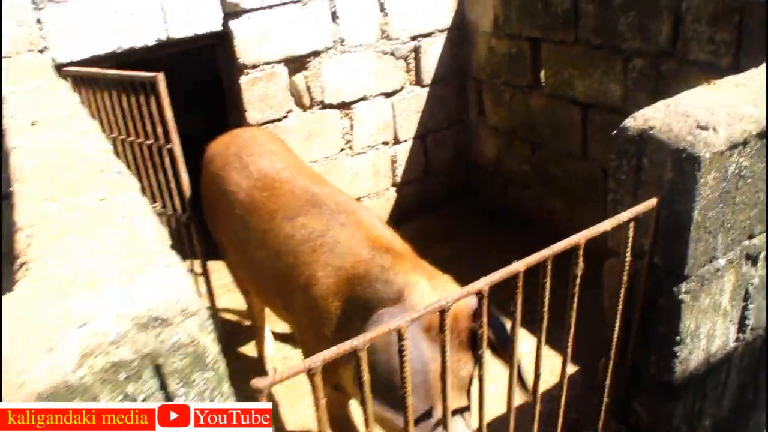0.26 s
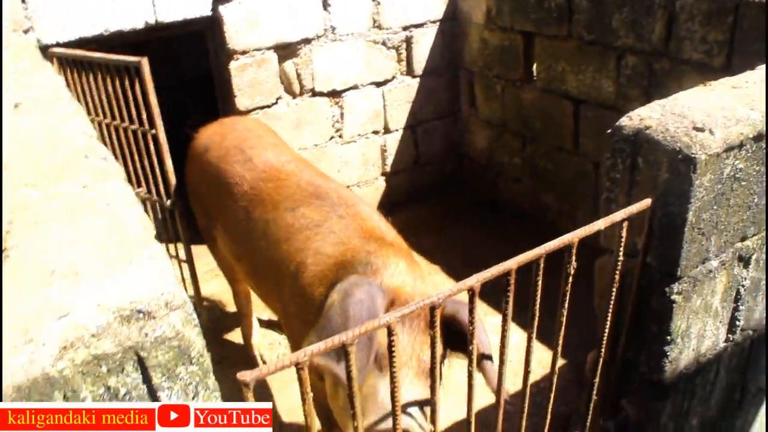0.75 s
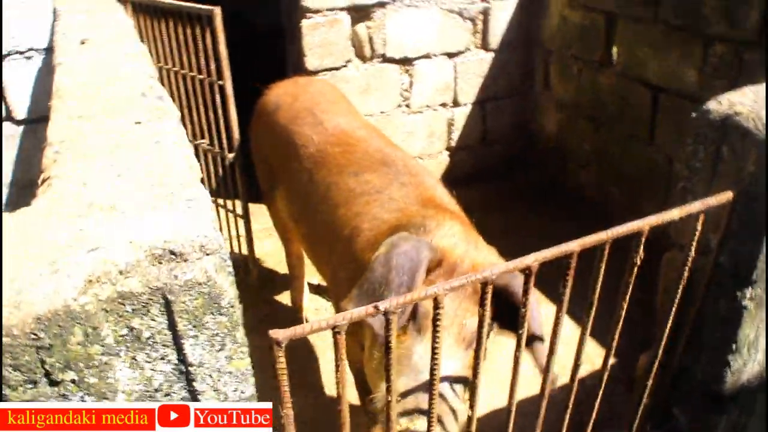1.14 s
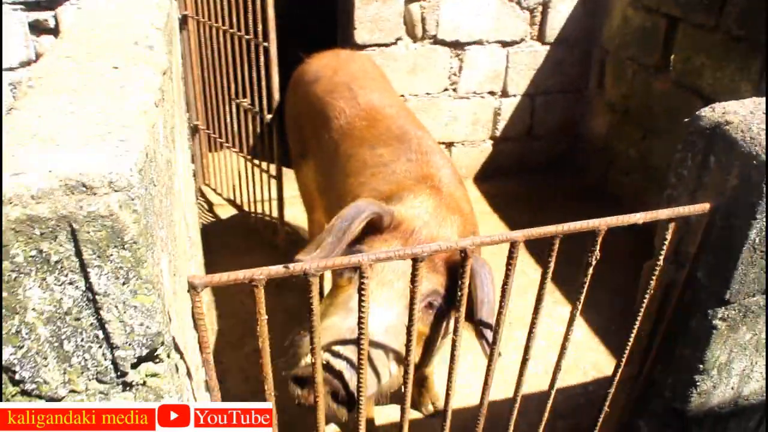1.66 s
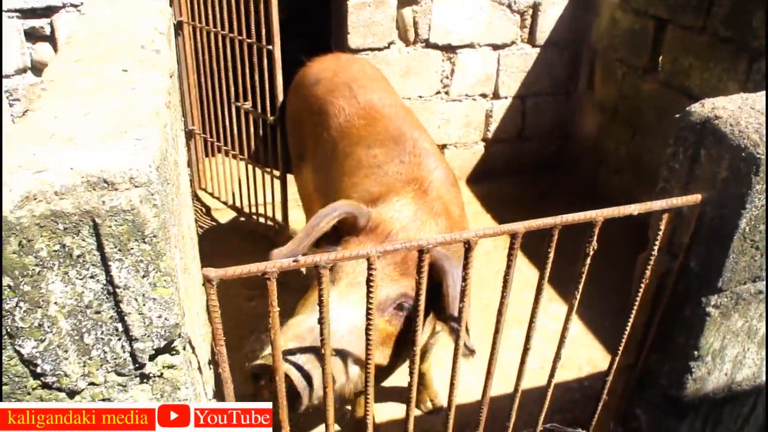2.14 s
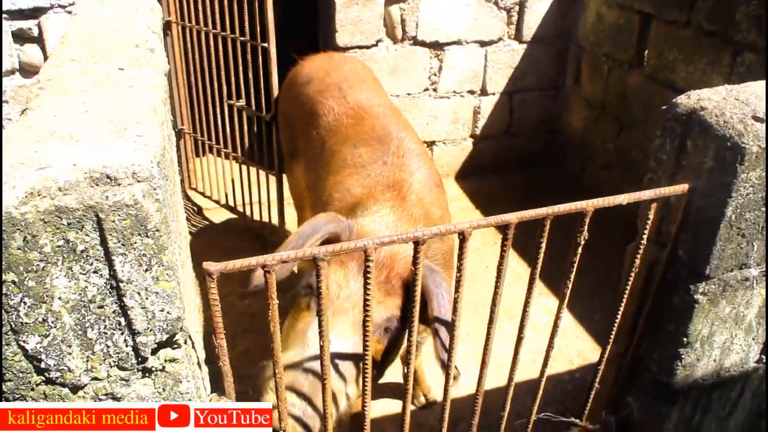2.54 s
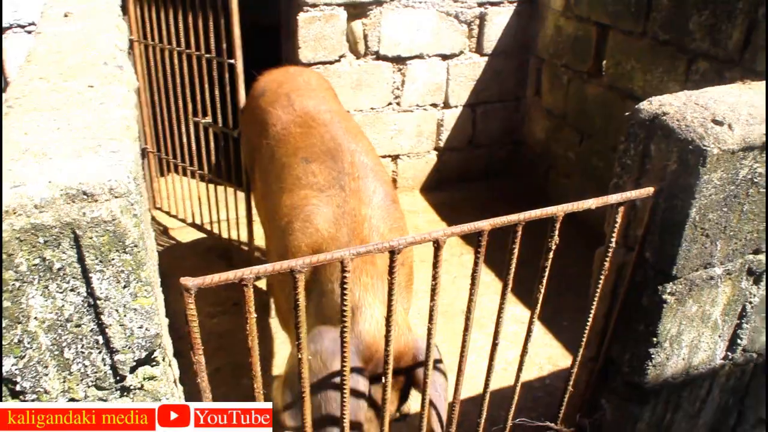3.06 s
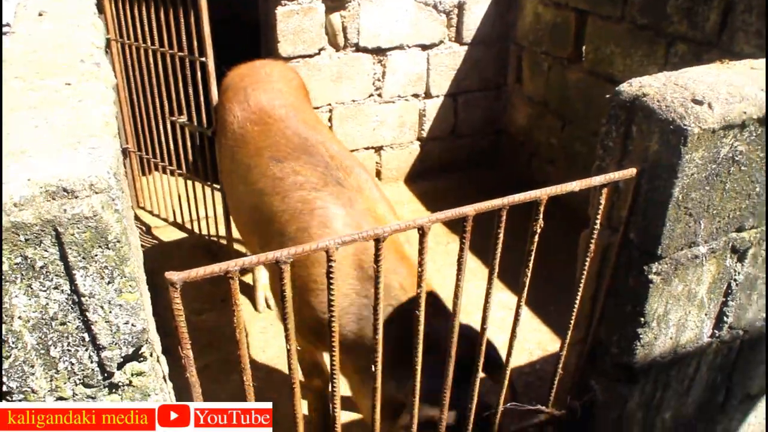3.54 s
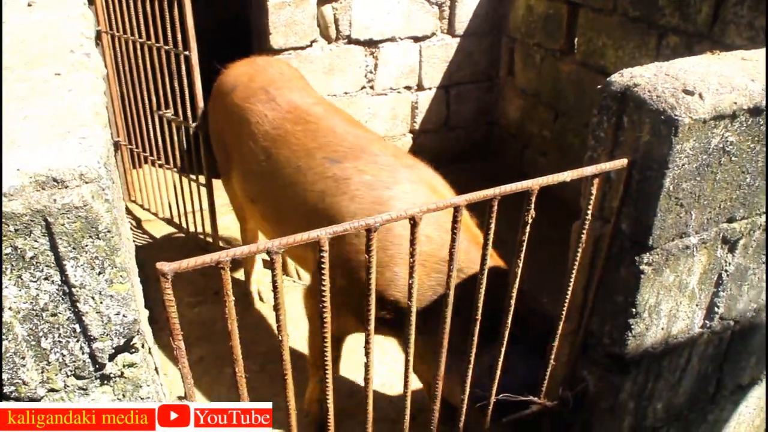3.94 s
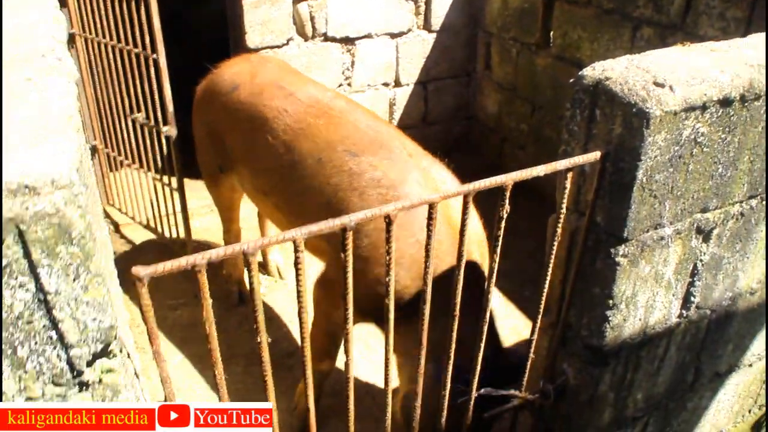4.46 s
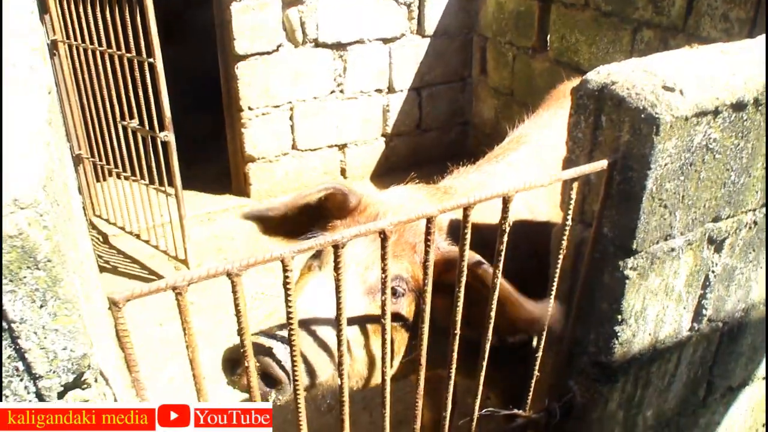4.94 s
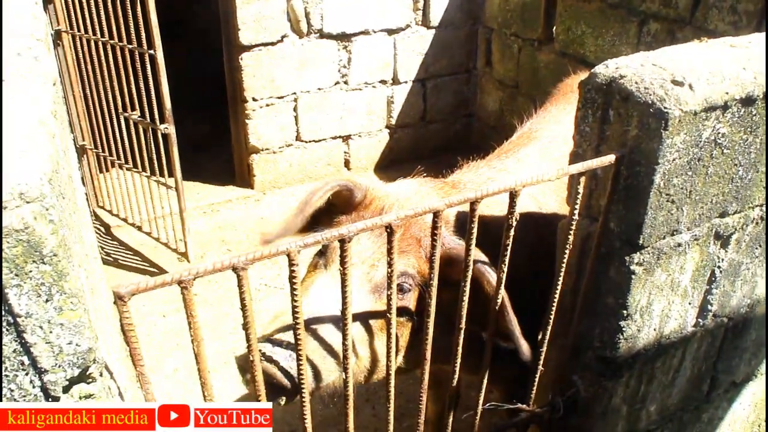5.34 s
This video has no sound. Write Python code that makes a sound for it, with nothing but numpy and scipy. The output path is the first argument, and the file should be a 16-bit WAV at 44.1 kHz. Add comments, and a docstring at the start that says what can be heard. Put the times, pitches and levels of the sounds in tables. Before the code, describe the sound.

A pig gives four short, low, pulsing grunts close by in a concrete pen, over high insect whine and outdoor rush, then dry clicks late on.

```python
"""In a concrete pen, close to the microphone, a pig grunts four times: slow slaps of the vocal folds ring
in throat and snout, with short gliding sine tones in and after the grunts, and breathy puffs of air. Beyond
it insects hold a high tone of beating narrow-band noise over a wide outdoor rush of coloured noise. Dry
ticks, mostly late on, and a gritty scrape are noise bursts and grains ringing short resonances; late wind
bumps the microphone. The level dips once, and a peak limiter holds the background down after loud peaks."""
import sys
import numpy as np
from scipy import signal
from scipy.fft import rfft, irfft
from scipy.io import wavfile
from scipy.ndimage import uniform_filter1d, minimum_filter1d

SR = 44100
rng = np.random.default_rng(int(sys.argv[2]) if len(sys.argv) > 2 else 0)


def dump_mix(stems):
    """Bounce the given channels to the path in sys.argv[1] as a 16-bit WAV at rate SR."""
    frames = np.atleast_2d(stems).T  # one column per channel
    limited = np.clip(frames, -1, 1)  # hard clip at full scale
    pcm = np.round(limited * 32767).astype(np.int16)
    wavfile.write(sys.argv[1], SR, pcm)


N = 247401
TIME = np.arange(N) / SR  # s
BINS = np.fft.rfftfreq(4096, 1 / SR)  # Hz

# Source levels below are those before the level curve DIP and the limiter.
# Grunts, one row each: start t/s, settled pulse rate f/Hz, extra length of the first gap t/s,
# mean scale of each slap's smear t/s, peak level/dB before smear and muffling, time from start to peak t/s,
# sag of effort one grunt's length from its peak level/dB, weakening of every second slap by the end level/dB,
# tilt at full effort level/dB per octave, rasp of air level/dB before muffling
GRUNTS = [(0.26, 49.7, 0.01, 0.001495, -6.5, 0.049, 8.5, 15, 2, -33),
          (2.0424, 51.2, 0.0044, 0.00056, 3.5, 0.02, 17.5, 2, 1, -33),
          (2.6516, 43.9, .0105, 0.00095, -2, 0.07, 31.5, 3.5, 0, -33),
          (3.7427, 50.33, 0.00026, 0.0035, -8.5, 0.029, 23, 7, 1, -33.5)]
# Slaps of the folds in each grunt: [count]
SLAPS = [5, 5, 5, 4]
# Throat and snout, one list a grunt: f/Hz before the mouth moves it, width f/Hz, relative level/dB before tilt
THROATS = [
    [(122, 48, 4.5), (296, 150, 0), (726, 36, -11.5), (1023, 65, 3), (1360, 244, -3.5), (1860, 100, -23),
     (2310, 130, -18), (3070, 440, -26.5), (3580, 100, -18.5)],
    [(106, 39, 1.5), (247, 80, 1.5), (350, 28, 3), (717, 110, -5.5), (1000, 81, 3.5), (1270, 140, -1),
     (1950, 100, -14.5), (2760, 460, -21.5), (3240, 210, -13.5), (4620, 420, -28)],
    [(112, 21, -4.5), (325, 98, 1), (688, 45, -3.5), (1086, 164, -7), (1460, 73, -4), (1800, 170, -15),
     (2660, 740, -34), (3520, 360, -27.5)],
    [(143, 164, 1.5), (288, 98, -14.5), (695, 31, 5), (855, 46, -3), (1153, 79, -1.5), (1470, 220, -12),
     (1740, 220, -14), (2150, 390, -22), (2860, 240, -18), (3650, 130, -18)],
]
# Mouth opening, one row a grunt, as a factor on the throat's f: at the start, in the middle, at the end
MOUTHS = [(1.2, 1.018, 0.93), (1.062, 0.97, 1.046), (1.015, 0.997, 0.975), (0.97, 1.07, 0.95)]
# Single throat resonances sounding on in and after the grunts:
# centre t/s, half length t/s, level/dB, f/Hz at centre, glide f/Hz per s
GLIDING_TONES = [(.277, 0.011, -32, 1960, -14000), (0.34, 0.014, -28, 990, -500),
                 (2.123, 0.0075, -30, 1300, 1500), (2.778, 0.017, -22.5, 390, 200),
                 (3.768, 0.039, -32, 137, 94), (3.752, 0.0088, -24.5, 1120, 500),
                 (3.817, 0.024, -31, 1200, 1001)]
# Air from the snout and scuffs on the floor: centre t/s, half length t/s, level/dB, tilt level/dB per octave
PUFFS = [(0.416, 0.035, -39.5, -1.5), (1.155, 0.33, -54.5, 4.5), (1.688, 0.02, -38, -4),
         (1.748, 0.048, -52.5, 3), (2.184, 0.032, -38, 2.5), (2.81, 0.027, -47, 4),
         (3.832, 0.028, -43.5, -0.5), (4.347, 0.055, -48.5, -3), (5.283, 0.023, -47, -2.5)]
# Spectrum of the puffs before tilt: f/Hz, relative level/dB
PUFF_COLOUR = [(300, -6), (1500, 12), (4300, 6), (7000, -2), (11000, -10), (14000, -6), (16000, -27)]
# Dry ticks before the pen's echoes: t/s, peak level/dB, decay t/s, tilt level/dB per octave,
# own ring f/Hz before a small common lowering, strength of that ring level/dB
TICKS = [(0.534, -36, .002, 5, 11200, -14), (1.407, -19.5, 0.0045, -5.5, 2430, 11),
         (3.675, -16.5, 0.001, -8, 3530, 8), (4.836, -35, .0015, 1, 2400, 0),
         (4.8815, -24, 0.0013, 1, 2400, 10), (5.1675, -22.5, 0.0018, 2, 10100, -14),
         (5.212, -18, 0.0015, -2, 2100, 8), (5.221, -18, 0.0025, -2.5, 2400, -12),
         (5.2534, -14, 0.00058, 7, 2070, 19), (5.258, -10, 0.0022, -1.5, 2700, -7),
         (5.268, -22, 0.0047, 0, 2360, 4), (5.5383, -23, 0.0012, 7, 2400, 4),
         (5.578, -20.5, 0.00094, 4, 2200, 10)]
# Short resonances of ticks and scrape: f/Hz before a small lowering, width f/Hz, relative level/dB before tilt
TICK_MODES = [(1150, 770, -3.5), (1860, 100, -11), (2405, 230, -2), (3330, 970, -1.5), (6100, 1300, -13.5),
              (7660, 1600, -14.5), (10000, 1700, -16.5), (13900, 1400, -15)]
# Surges of the insects' tone: start t/s, nominal length t/s, level/dB before a common trim
SURGES = [(0.023, 0.091, -27.5), (0.639, 0.045, -29.5), (1.056, 0.1, -30.5), (1.581, 0.078, -31),
          (1.877, 0.024, -33.5), (2.032, 0.035, -27), (3.357, 0.048, -31), (3.669, 0.051, -24.5),
          (3.866, 0.041, -29), (4.382, 0.073, -30), (5.154, 0.044, -28), (5.471, 0.05, -28)]
# Faint upper lines of the insects: f/Hz, spread f/Hz, level/dB
OVERTONES = [(9155, 12, -67), (12100, 45, -78.5), (6670, 10, -72.5), (5750, 25, -70)]
# Outdoor rush: f/Hz, relative level/dB per Hz
RUSH = [(15, -45), (28, -17.5), (53, -7), (120, -5.5), (200, -1), (380, 0.5), (850, -2.5), (1400, -8),
        (2500, -15.5), (4000, -22), (6000, -30.5), (8000, -39), (13800, -45.5), (15200, -52)]
# Wind on the microphone: centre t/s, half length t/s, level/dB
GUSTS = [(4.934, .022, -35), (4.98, 0.017, -31), (5.072, .025, -39), (5.2, 0.022, -38),
         (5.51, 0.022, -33.5), (5.57, 0.017, -38)]
# Spectrum of the wind: f/Hz, relative level/dB
GUST_COLOUR = [(15, -20), (40, -0.5), (70, 2), (120, -2.5), (250, -23), (800, -66)]
# Echoes from the floor and walls of the pen: delay t/s, level/dB
WALLS = [(.0037, -52), (.0071, -28), (0.0098, -40), (0.016, -25)]
# Gain curve of the whole scene, end values held: t/s, level/dB
DIP = [(4.671, 6), (4.674, -3), (4.73, 1), (4.8, 3.5), (4.86, 7)]

SNAP_S = .0028  # the folds part gently and close sharply: upper limit of the treble's lag behind the bass
DAMPING_S = 0.02  # the folds part again and damp the ring of each slap
BRIGHTENING = 0.26  # harder slaps are brighter: dB per octave for each dB of effort
SNOUT_HZ = 2500  # resonances from here up lie in the bony snout and do not move
OWN_RING_WIDTH_HZ = 290
SCRAPE_S, SCRAPE_HALF_S, SCRAPE_DB, GRAINS_PER_S = 5.258, .045, -38.5, 2000
CHORUS_HZ, CHORUS_SPREAD_HZ, CHORUS_DB = 3051.5, 9.6, -40
OCTAVE_SPREAD_HZ, OCTAVE_DB = 16.3, -50.5
RUSH_DB = -34
CEILING_DB, EDGE_HZ = -1, 15200  # limiter threshold and upper band edge of the recorder


def grunts(settling=0.36, jitter=0.024, muffle_hz=4800):
    """Fold slaps settle to a steady rate, ring the moving throat, and alternate strong and weak towards the end."""
    out = np.zeros(N)
    for row, count, opening, throat in zip(GRUNTS, SLAPS, MOUTHS, THROATS):
        start, rate_hz, lag, smear, peak_db, crest, sag_db, limp_db, bright_db, rasp_db = row
        gaps = 1 / rate_hz + lag * settling ** np.arange(count - 1)
        slaps = np.cumsum(np.append(0, gaps))
        length = slaps[-1]
        for k, t in enumerate(slaps):
            arch_db = -sag_db * ((t - crest) / length) ** 2
            limp = limp_db * (k % 2) * (t / length) ** 2
            effort_db = arch_db - limp
            mouth = np.interp(t / length, [0, .5, 1], opening) + jitter * rng.standard_normal()
            tilt_db = bright_db + BRIGHTENING * effort_db
            modes = [(hz * mouth if hz < SNOUT_HZ else hz, width, db) for hz, width, db in throat]
            # the peak without smear sets the level, so a smeared slap comes out softer
            clean_peak = abs(ring(modes, 1, tilt_db, SNAP_S)).max()
            slap = ring(modes, 1, tilt_db, SNAP_S, smear) / clean_peak
            damping = np.exp(-(TIME[:len(slap)] / DAMPING_S) ** 2)
            add(out, start + t, gain_of(peak_db + effort_db) * slap * damping)
        add(out, start, gain_of(rasp_db) * rasp(throat, length + 1 / rate_hz))
    # soft flesh swallows the treble
    return signal.lfilter(*signal.butter(2, muffle_hz, fs=SR), out)


def rasp(throat, length, tilt_db=4):
    """Air leaking between the slaps roughens the grunt with noise in the same resonances, slightly lowered."""
    air = signal.fftconvolve(rng.standard_normal(SR // 2), ring(throat, 0.97, tilt_db), "valid")
    t = TIME[TIME < length]
    return evened(air)[:len(t)] * np.sqrt(np.sin(np.pi * t / length))


def gliding_tones():
    """Single throat resonances sound on in and after the grunts: short gliding sine tones."""
    out = np.zeros(N)
    for s, half, db, hz, glide in GLIDING_TONES:
        since = TIME - s
        turns = hz * since + glide * since ** 2 / 2 + rng.random()
        out += gain_of(db) * swell(s, half) * np.sqrt(2) * np.sin(2 * np.pi * turns)
    return out


def puffs():
    """Turbulent air and floor scuffs: short swells of breathy noise."""
    return sum(gain_of(db) * swell(s, half) * noise(PUFF_COLOUR, tilt_db) for s, half, db, tilt_db in PUFFS)


def ticks():
    """Tiny crunches, each a burst into the same short resonances and one ring of its own."""
    out = np.zeros(N)
    for s, db, decay, tilt_db, ring_hz, ring_db in TICKS:
        modes = [*TICK_MODES, (ring_hz, OWN_RING_WIDTH_HZ, ring_db)]
        tick = signal.fftconvolve(burst(decay), ring(modes, 0.95, tilt_db))
        add(out, s, gain_of(db) * tick / abs(tick).max())
    return out


def scrape(size_spread_db=3, tilt_db=-5):
    """A short gritty scrape: scattered grains, a few of them large, ring the same resonances as the ticks."""
    sizes = gain_of(size_spread_db * np.minimum(rng.exponential(1, N), 4))
    signs = rng.choice([-1, 1], N)
    grains = sizes * signs * (rng.random(N) < GRAINS_PER_S / SR)
    grit = evened(signal.oaconvolve(grains, ring(TICK_MODES, 0.99, tilt_db))[:N])
    return gain_of(SCRAPE_DB) * swell(SCRAPE_S, SCRAPE_HALF_S) * grit


def pen(x, tail_db=-19, t60=0.42, dull_hz=3000):
    """An open-topped pen: a few wall echoes and a short dull tail of decaying noise."""
    t = TIME[:SR // 2]
    tail = signal.lfilter(*signal.butter(1, dull_hz, fs=SR), rng.standard_normal(len(t)))
    first_echo_s = WALLS[0][0]
    tail *= np.exp(-np.log(1000) * t / t60) * (t > first_echo_s)
    response = gain_of(tail_db) * tail / np.linalg.norm(tail)
    for delay, db in WALLS:
        response[round(delay * SR)] += gain_of(db)
    return x + signal.fftconvolve(x, response)[:N]


def insects(surge_db=-5, surge_width=.55):
    """A thin whistling drone that beats at random and surges now and then, with its octave and upper lines."""
    surges = sum(gain_of(db + surge_db) * swell(s + length / 2, surge_width * length)
                 for s, length, db in SURGES)
    out = gain_of(CHORUS_DB) * beating_tone(CHORUS_HZ, CHORUS_SPREAD_HZ)
    out += surges * beating_tone(CHORUS_HZ, CHORUS_SPREAD_HZ, steadiness=1)
    out += gain_of(OCTAVE_DB) * beating_tone(2 * CHORUS_HZ, OCTAVE_SPREAD_HZ)
    return out + sum(gain_of(db) * beating_tone(hz, spread) for hz, spread, db in OVERTONES)


def beating_tone(hz, spread_hz, steadiness=0.11):
    """Many singers near one pitch beat: narrow-band noise about it, its level swings partly evened out."""
    offset = np.fft.fftfreq(N, 1 / SR) / spread_hz
    white = rng.standard_normal(N) + 1j * rng.standard_normal(N)
    cloud = evened(np.fft.ifft(np.fft.fft(white) * np.exp(-abs(offset) / 1.4)))
    cloud = cloud / (abs(cloud) ** 2 + 0.87) ** (steadiness / 2)
    return evened((cloud * np.exp(2j * np.pi * hz * TIME)).real)


def outdoors():
    """A steady distant rush of noise, and low bumps of wind on the microphone."""
    gusts = sum(gain_of(db) * swell(s, half) for s, half, db in GUSTS)
    return gain_of(RUSH_DB) * noise(RUSH) + gusts * noise(GUST_COLOUR)


def ring(modes, shift, tilt_db, snap=0, smear=0):
    """Causal (minimum-phase) response of resonances to one knock; the treble lags the bass by up to snap s."""
    shape = sum(gain_of(db) / (1 + (2 * (BINS - hz * shift) / width) ** 2) for hz, width, db in modes)
    shape = shape * gain_of(tilt_db * octaves(BINS)) * BINS / (BINS + 40)  # weak below 40 Hz
    log_gain = np.log(np.maximum(shape / shape.max(), 1e-5))
    circle = np.concatenate([log_gain, log_gain[-2:0:-1]])
    spectrum = np.exp(np.conj(signal.hilbert(circle)))[:len(BINS)]
    # a ragged slap lets each band arrive a little late, by chance
    ragged = abs(evened(uniform_filter1d(rng.standard_normal(len(BINS)), size=30)))
    delay = snap * BINS / (BINS + 1200) + smear * ragged
    phase = 2 * np.pi * np.cumsum(delay) * BINS[1]
    return irfft(spectrum * np.exp(-1j * phase)) * np.linspace(1, 0, len(circle))


def burst(decay):
    """A dying puff of noise of energy 1."""
    t = TIME[:len(BINS)]
    puff = rng.standard_normal(len(t)) * np.exp(-t / decay)
    return puff / np.linalg.norm(puff)


def noise(colour, tilt_db=0):
    """Noise of rms 1 with a spectrum of (Hz, dB) points and a tilt per octave."""
    hz = np.fft.rfftfreq(N, 1 / SR)
    at, db = np.transpose(colour)
    shape = gain_of(np.interp(np.log(hz + 1), np.log(at), db) + tilt_db * octaves(hz))
    return evened(irfft(rfft(rng.standard_normal(N)) * shape, N))


def swell(centre, half):
    """A bell-shaped rise and fall, down to 1/e at half s from the centre."""
    return np.exp(-((TIME - centre) / half) ** 2)


def octaves(hz):
    """Octaves above 1 kHz, held constant below 200 Hz."""
    return np.log2(np.maximum(hz, 200) / 1000)


def gain_of(db):
    """Decibels to amplitude."""
    return 10 ** (np.asarray(db) / 20)


def evened(x):
    """Scales to rms 1."""
    return x / np.sqrt(np.mean(abs(x) ** 2) + 1e-20)


def add(mix, s, sound):
    """Mixes a sound in at time s."""
    part = mix[round(s * SR):][:len(sound)]
    part += sound[:len(part)]


def scene():
    """The pig, ticks and scrape echo in the pen; puffs, insects and outdoors stay dry; the level dips once."""
    in_pen = pen(grunts() + gliding_tones() + ticks() + scrape())
    farm = in_pen + puffs() + insects() + outdoors()
    level_db = np.interp(TIME, *np.transpose(DIP))
    return (farm * gain_of(level_db))[None]


def record(dry, hold=0.18, recovery_db=50):
    """A peak limiter that holds (s) and then recovers (dB a second), and the band limit."""
    over_db = np.maximum(20 * np.log10(abs(dry[0]) + 1e-9) - CEILING_DB, 0)
    over_db = -minimum_filter1d(-over_db, size=128)  # it looks a moment ahead
    reach = int(hold * SR / 2)
    held_db = -minimum_filter1d(-over_db, 2 * reach + 1, origin=reach)
    fall = recovery_db * TIME
    duck_db = np.maximum.accumulate(held_db + fall) - fall
    duck_db = uniform_filter1d(duck_db, size=128)
    low_pass = signal.firwin(511, EDGE_HZ, window=("kaiser", 9), fs=SR)
    return signal.oaconvolve(dry * gain_of(-duck_db), low_pass[None], "same")


dry = scene()
out = record(dry)
dump_mix(out)
```